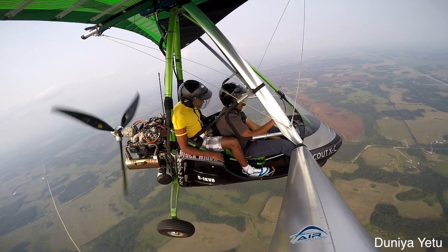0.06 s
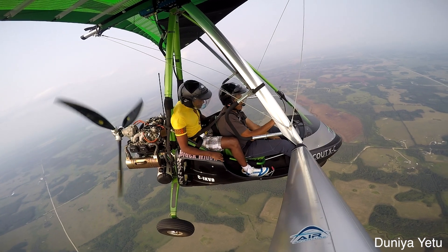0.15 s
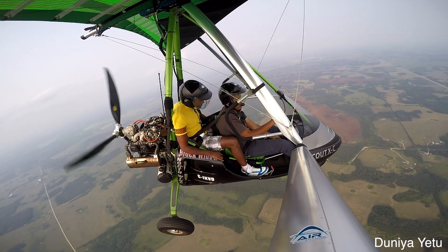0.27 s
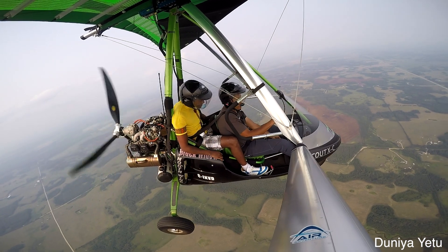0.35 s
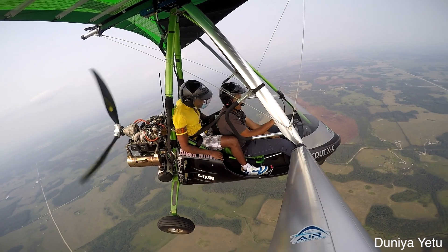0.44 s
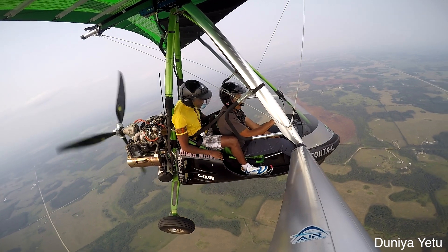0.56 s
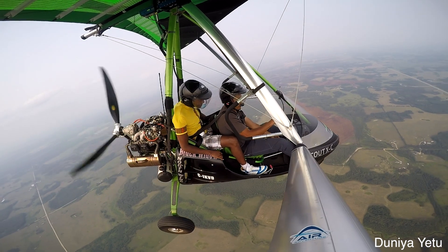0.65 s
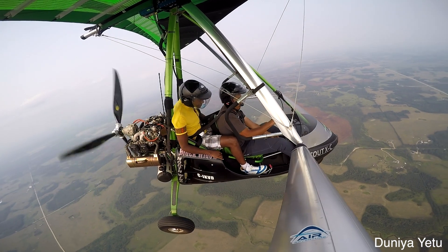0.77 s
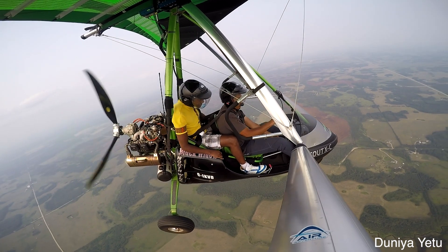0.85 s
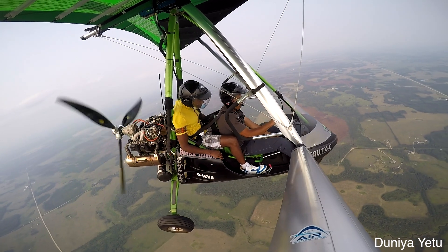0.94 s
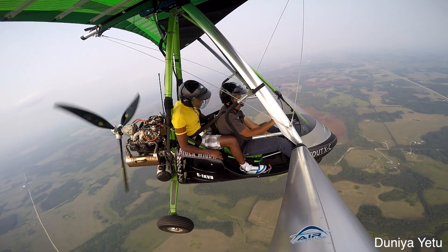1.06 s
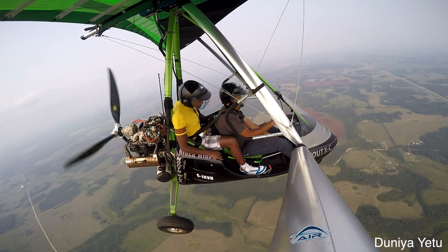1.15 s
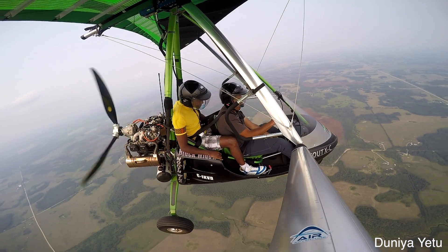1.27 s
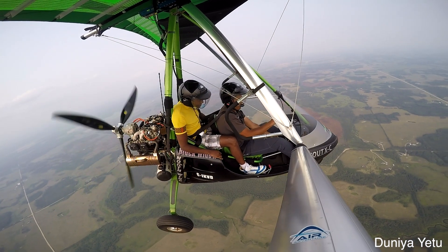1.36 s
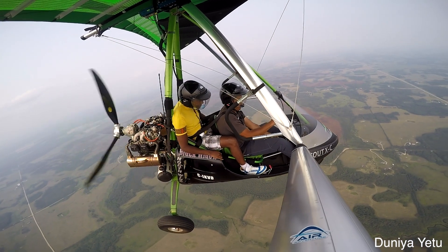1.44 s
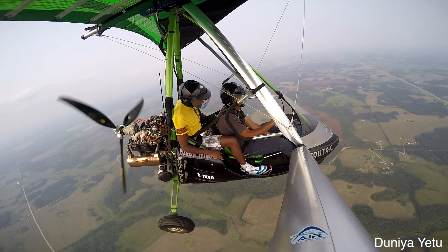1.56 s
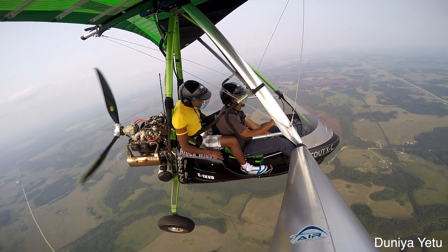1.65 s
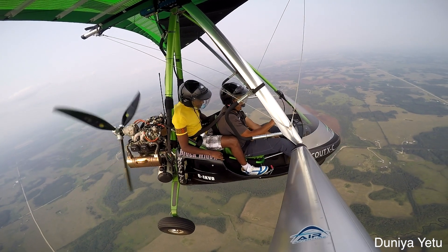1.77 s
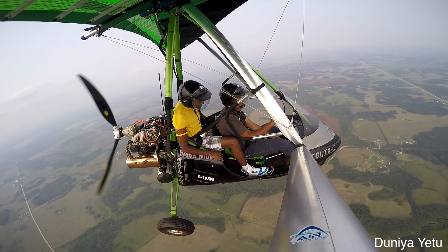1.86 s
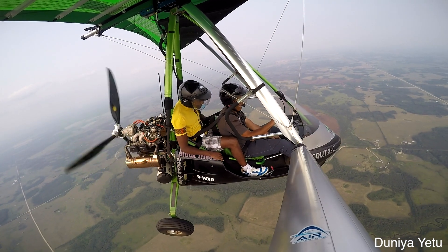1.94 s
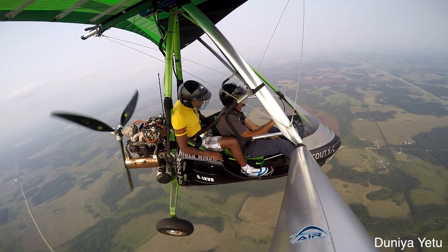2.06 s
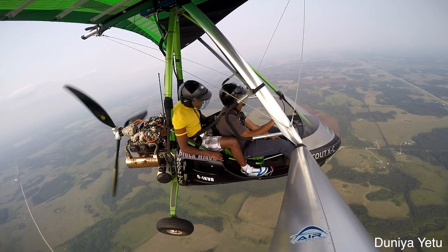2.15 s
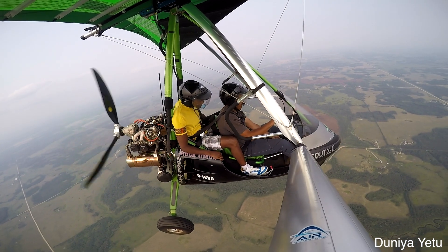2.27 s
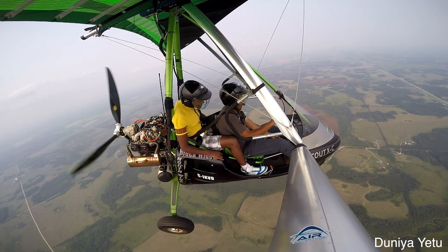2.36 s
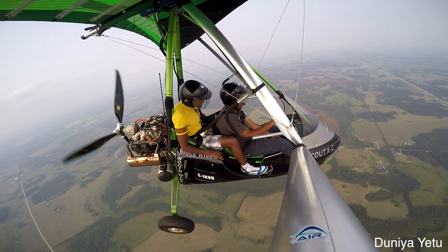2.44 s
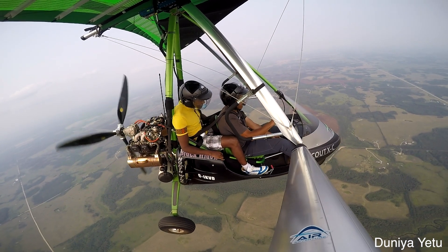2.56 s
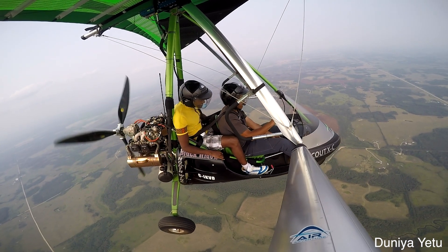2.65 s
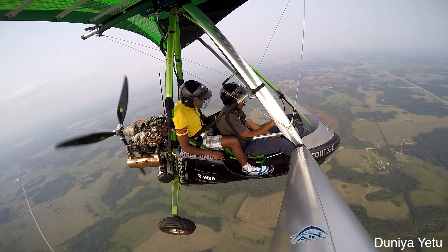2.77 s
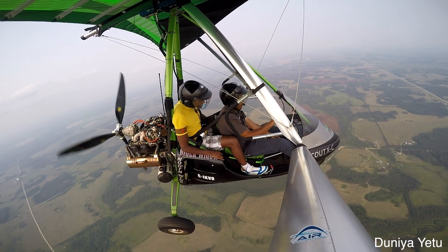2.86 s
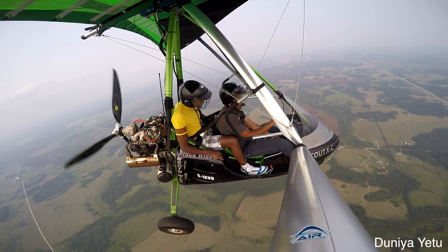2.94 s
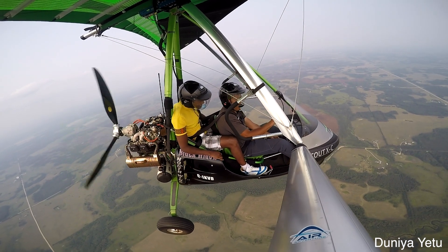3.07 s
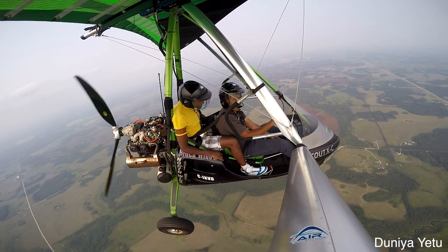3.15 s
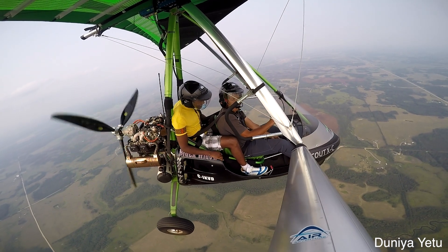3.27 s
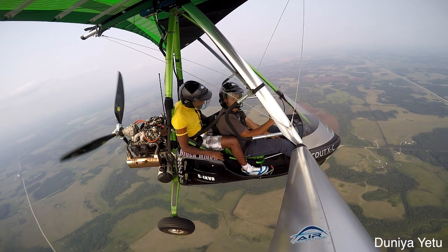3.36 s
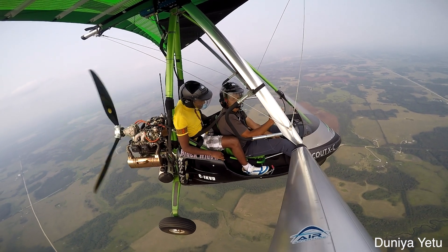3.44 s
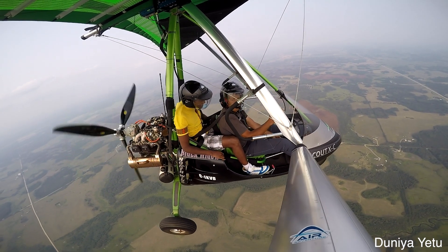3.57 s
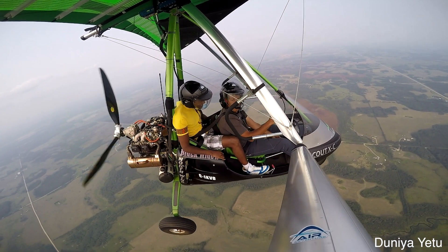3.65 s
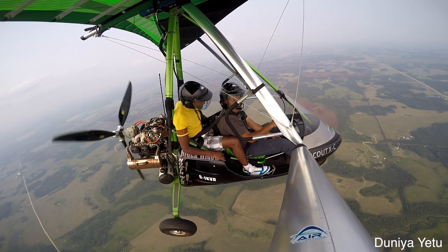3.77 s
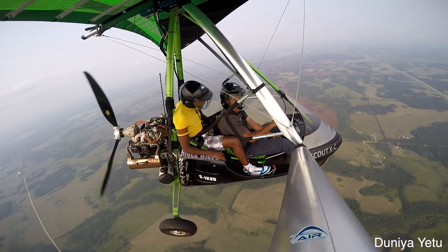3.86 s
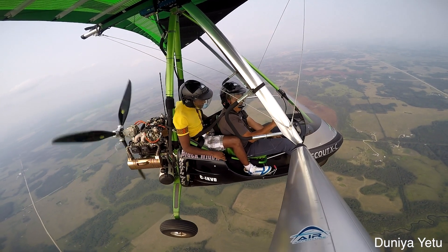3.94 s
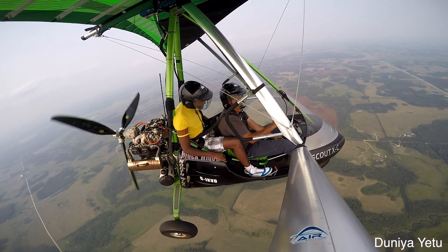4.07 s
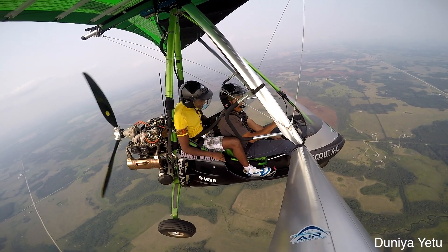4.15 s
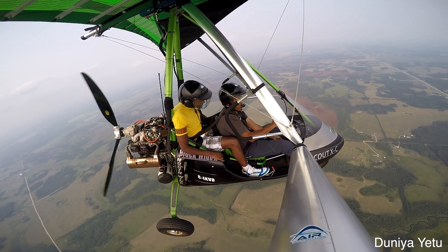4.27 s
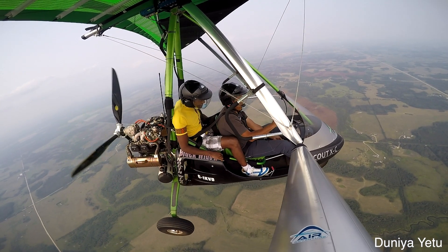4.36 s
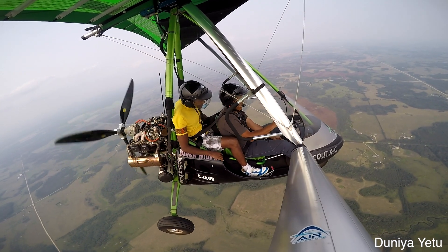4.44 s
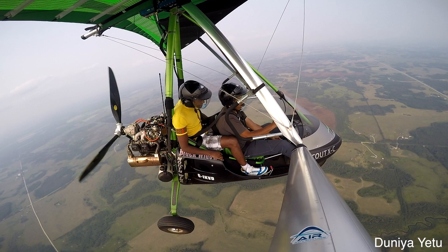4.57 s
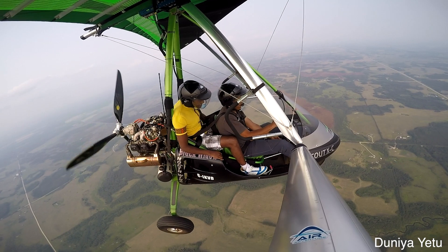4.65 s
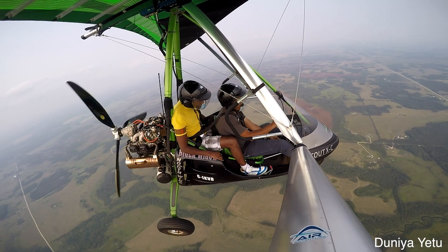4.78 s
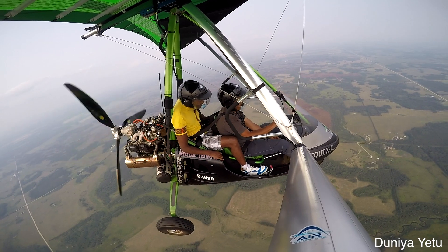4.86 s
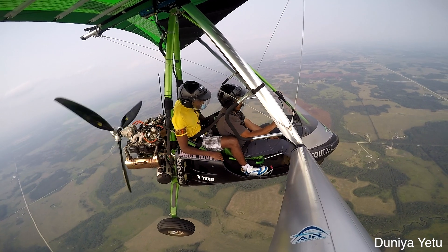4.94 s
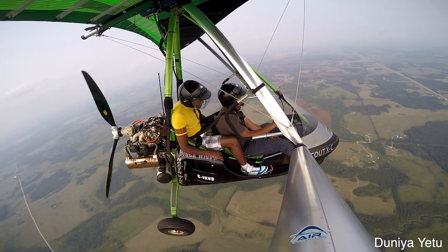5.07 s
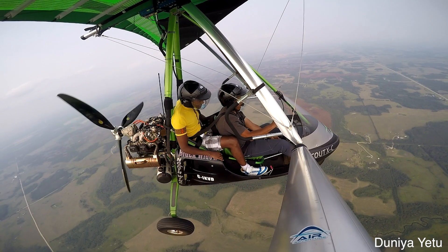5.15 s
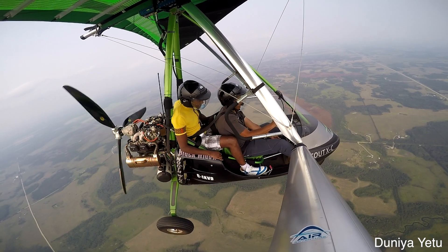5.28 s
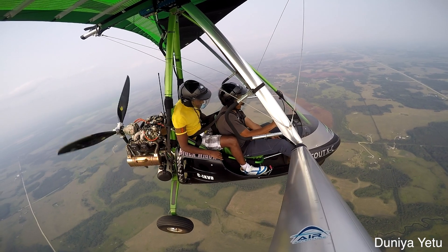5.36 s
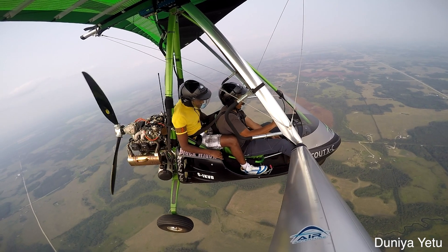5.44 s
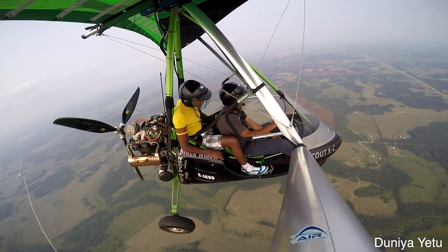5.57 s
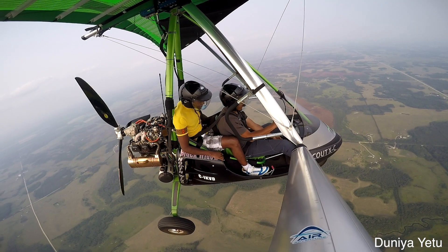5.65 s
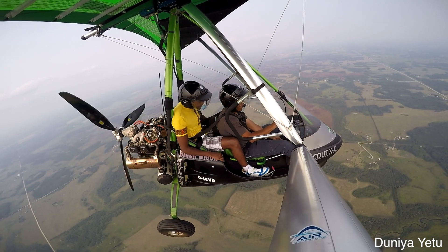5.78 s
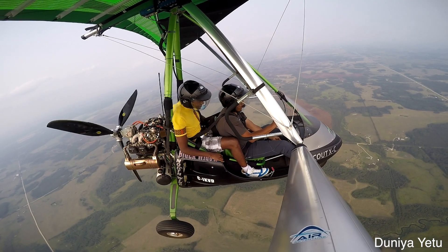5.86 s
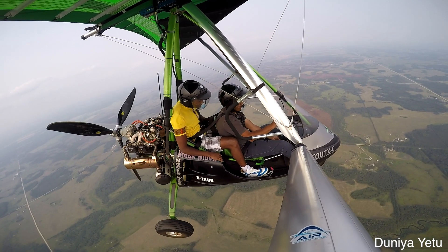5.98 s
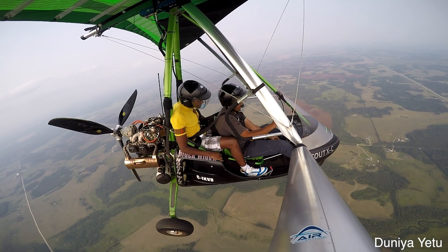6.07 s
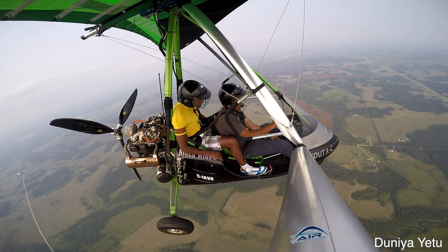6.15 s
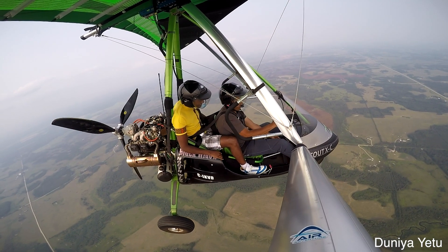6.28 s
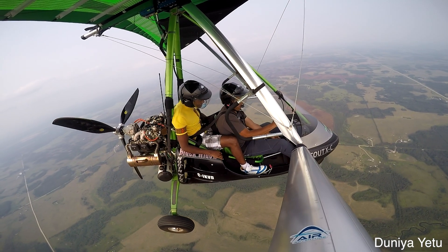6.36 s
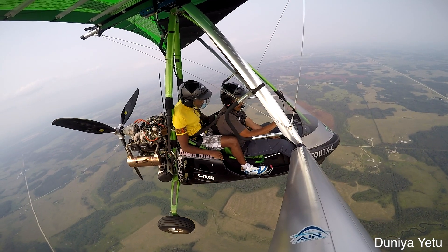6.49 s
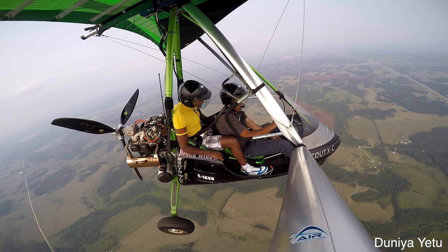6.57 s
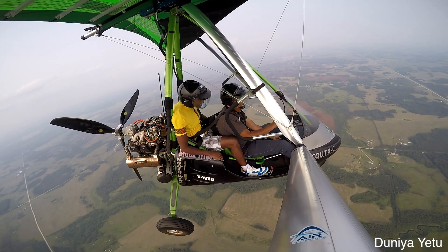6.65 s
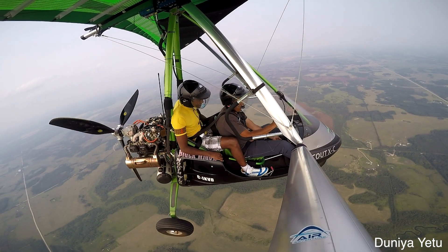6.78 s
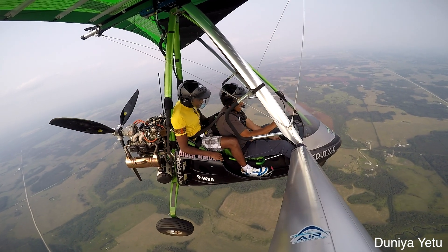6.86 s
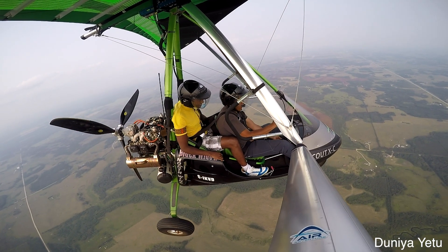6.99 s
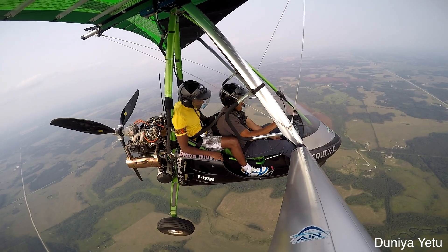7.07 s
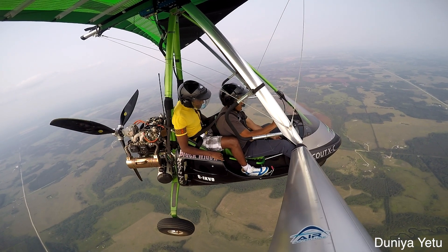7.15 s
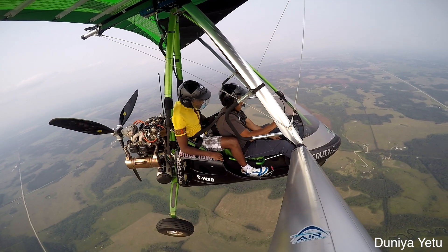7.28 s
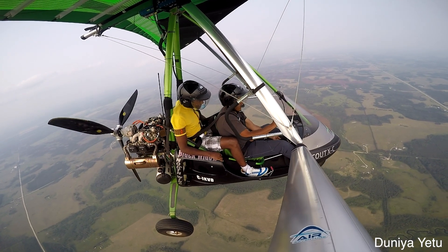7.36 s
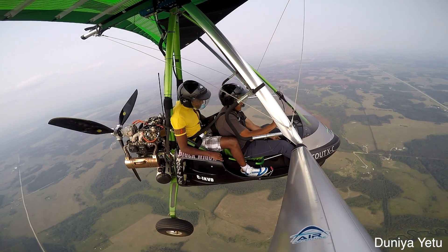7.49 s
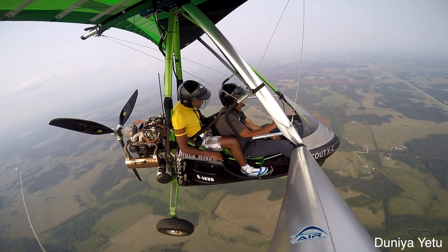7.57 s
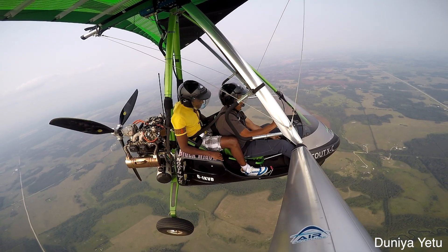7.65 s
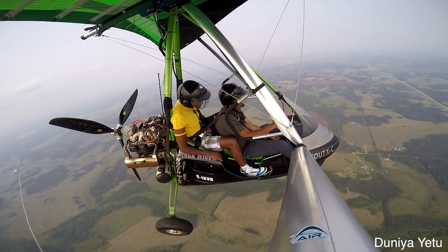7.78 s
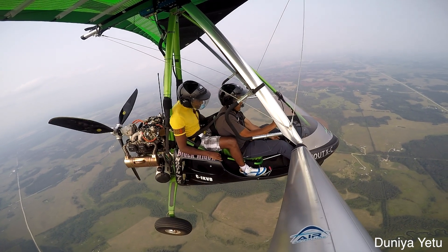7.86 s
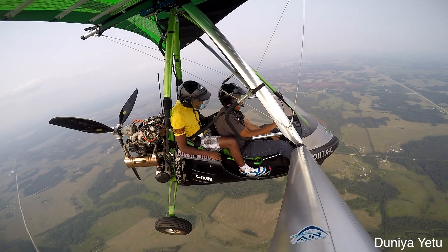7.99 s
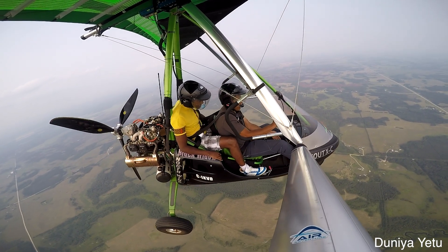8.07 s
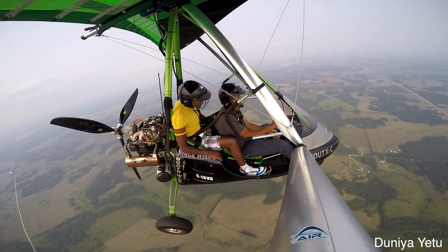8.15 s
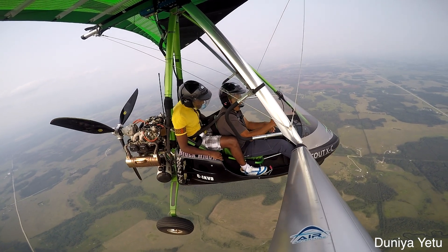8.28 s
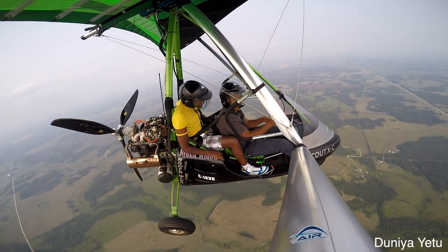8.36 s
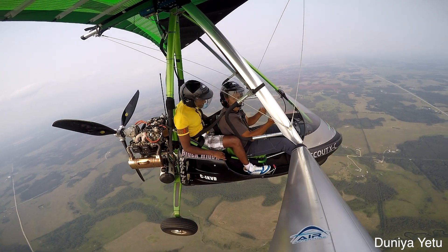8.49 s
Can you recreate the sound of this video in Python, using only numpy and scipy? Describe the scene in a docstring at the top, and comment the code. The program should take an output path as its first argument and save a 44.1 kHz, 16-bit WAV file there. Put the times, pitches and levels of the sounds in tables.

```python
"""Microlight glide with the propeller running down

A microlight trike glides, heard from a microphone in a housing on a pole fixed to the wing.
The three-blade propeller slows to a stop: sines at multiples of its speed sweep through the pole's resonance.
The loose mount knocks at listed times: bursts of chattering noise ring its modes, some with rebounds.
Wind is shaped noise: it hums on the tubes, whistles on the wires, rushes over the housing and buffets the pole."""
import sys
import numpy as np
from scipy import signal
from scipy.fft import rfft, irfft
from scipy.io import wavfile
from scipy.ndimage import uniform_filter1d, minimum_filter1d, map_coordinates

SR = 44100
rng = np.random.default_rng(int(sys.argv[2]) if len(sys.argv) > 2 else 0)


def inscribe(sig):
    """Save sig as 16-bit PCM at rate SR to the path in sys.argv[1].

    A 1-D sig is mono; a 2-D sig holds one channel per row.
    Samples are clipped to [-1, 1] before scaling.
    """
    pcm = np.round(np.clip(np.atleast_2d(sig).T, -1, 1) * 32767)
    wavfile.write(sys.argv[1], SR, pcm.astype(np.int16))


N = 375732  # length in samples


def propeller(start_turns_per_s=18.4, stop_s=6.2, run_down_power=0.69, pole_hz=29.9, pole_q=3.9, unsteady_db=1.5):
    """The falling orders of the shaft swell as each sweeps through the pole's bending resonance."""
    # shakes per turn of the shaft (three is the blade pass)
    shaft_orders = (2, 3, 4, 6)
    # strength of each order at the pole's resonance: level_db
    order_db = [-13.5, -14.5, -27, -15.5]
    # a power under 1 means that friction brakes the propeller hardest at the end
    time_left = np.maximum(1 - np.arange(N) / SR / stop_s, 1e-6)
    turns_per_s = start_turns_per_s * time_left ** run_down_power
    shaft_angle = 2 * np.pi * np.cumsum(turns_per_s) / SR
    shaking = np.zeros(N)
    for order, db in zip(shaft_orders, order_db):
        ratio = order * turns_per_s / pole_hz
        # complex response: both the swell and the phase shift of the resonance
        response = 1 / (1 + 1j * pole_q * (ratio - 1 / ratio))
        strength = np.sqrt(2) * from_db(db + unsteady_db * drift(3.7))
        shaking += strength * np.imag(response * np.exp(1j * order * shaft_angle))
    return shaking


def mount_knocks(level_db=1.0, chatter_s=0.0029, crack_db=8.5, edge_db=-9.0, edge_s=0.003, ping_hz=4200):
    """Each knock is a few milliseconds of chattering contact: a crack, then the ring of the mount's modes."""
    # what the mount and housing ring with: mode_hz [Hz], level_db [dB], t60_s [s]
    mount_modes = [(761, -9.5, 0.027), (1045, -10.5, 0.024), (1360, -14.5, 0.034), (1724, -17.5, 0.022),
                   (2170, -11, 0.021), (2570, -11.5, 0.019), (3150, -14, 0.015), (3660, -14, .014),
                   (3950, -21, .014), (4486, -8, 0.013), (5080, -10.5, 0.0088), (5610, -12.5, 0.0094),
                   (5920, -22, 0.0075)]
    times_s, strength_db, ping_db = np.transpose(contacts())
    t = np.arange(2200) / SR
    chatter = rng.standard_normal((len(times_s), len(t)))
    contact = unit_energy(chatter * np.exp(-(t / chatter_s) ** 2))
    knocks = from_db(crack_db) * contact
    for hz, db, t60 in mount_modes:
        # a mode weighs as much as its ring from a single click
        size = np.linalg.norm(ring(t == 0, hz, t60))
        # a harder contact favours the high, pinging modes; each knock also differs by chance
        colour_db = ping_db * (hz > ping_hz) + rng.normal(0, 1, len(times_s))
        mode_gain = size * from_db(db + colour_db)[:, None]
        knocks += mode_gain * unit_energy(ring(contact, hz, t60))
    # the small stiff housing passes no bass and little top
    housing = signal.butter(6, [600, 6400], "band", fs=SR, output="sos")
    knocks = signal.sosfilt(housing, knocks)
    # a brief bright edge, stronger for a harder contact
    bright = signal.butter(2, [5500, 11000], "band", fs=SR, output="sos")
    edge = signal.sosfilt(bright, unit_energy(contact * np.exp(-t / edge_s)))
    knocks += from_db(edge_db + ping_db)[:, None] * edge
    out = np.zeros(N)
    for s, db, knock in zip(times_s, strength_db, knocks):
        start = int(s * SR)
        out[start:start + len(t)] += from_db(level_db + db) * knock
    return out


def contacts(rebound_s=0.0475, rebound_loss_db=6):
    """The loose mount rebounds at a steady pace, weaker each time; rows of (s, strength dB, ping dB)."""
    # knocks of the mount: start_s [s], strength_db [dB], ping_emphasis_db [dB], rebounds [count]
    knock_list = [(0.9427, -9, -2, 0), (.9853, -10.5, 3, 1), (1.4942, -5, -4, 0), (1.5515, -11.5, 4, 0),
                  (2.903, -7, -10, 0), (3.2552, -5.5, -3.5, 0), (3.7858, -4.5, -8, 1), (4.039, -4.5, -6, 1),
                  (4.6302, -9, -3, 0), (4.7437, -6, -6, 0), (4.7960, 0.5, 2.5, 1), (4.899, 3.5, 0, 0),
                  (4.9486, -1, 0, 3), (5.1439, -11, 3.5, 0), (5.3015, -1, 0.5, 0), (5.5197, -5.5, -4, 0),
                  (5.641, 1.5, 3, 0), (7.1595, -5.5, -6, 0), (7.895, -9.5, 5, 0)]
    rows = []
    for s, db, ping_db, rebounds in knock_list:
        for k in range(1 + rebounds):
            rows.append((s + k * rebound_s, db - k * rebound_loss_db, ping_db))
    return rows


def tube_hum(hum_db, steadiness=0.31, wander=0.0222):
    """Vortex shedding is a half-steady tone on each tube; all pitches wander together."""
    # vortices shed by tubes and struts: pitch_hz [Hz], width_hz [Hz], level_db [dB per Hz]
    tube_tones = [(137.8, 17.3, -33.5), (170, 17, -39), (189.4, 15.3, -43.5), (230.1, 14.6, -39),
                  (260, 26, -49.5), (287.3, 15.3, -50)]
    hum = np.zeros(N)
    for tone in tube_tones:
        shed = noise(humps([tone]))
        # dividing by part of the tone's own swell evens out its loudness
        power = uniform_filter1d(shed ** 2, size=600)
        swell = np.sqrt(np.maximum(power, 1e-12)) / shed.std()
        hum += shed / swell ** steadiness
    # reading at an uneven pace bends the pitch
    clock = np.arange(N) + np.cumsum(wander * drift(3.037))
    hum = map_coordinates(hum, [clock], order=1, mode="reflect")
    return from_db(hum_db - hum_db.mean()) * hum


def wind(rush_db, flutter_db=0.71, whistle_flutter_db=-0.6):
    """Turbulent rush and narrow whistles rise and flutter together; the whistles also waver on their own."""
    # turbulence over the housing, at mean airstream: frequency_hz [Hz], level_db [dB per Hz]
    rush_curve = [(200, -60), (350, -62.5), (520, -65.5), (660, -62.5), (1100, -60.5), (2000, -60),
                  (3700, -59.5), (4250, -68), (6000, -74.5), (8300, -80.5), (9700, -84), (11800, -84.5),
                  (12600, -88), (15200, -95)]
    # wires and housing gaps, at mean airstream: pitch_hz [Hz], width_hz [Hz], level_db [dB per Hz]
    whistle_tones = [(714, 170, -58.5), (869, 31, -52), (1261, 59, -56.5), (1600, 355, -60),
                     (2520, 322, -53.5), (2920, 200, -55.5), (3170, 350, -62), (3870, 173, -57.5),
                     (4676, 390, -67.5), (5520, 190, -69.5), (6624, 820, -67), (10570, 710, -85)]
    gust_db = rush_db - rush_db.mean() + flutter_db * drift(58)
    rush = noise(slope(rush_curve))
    whistles = from_db(whistle_flutter_db * drift(13)) * noise(humps(whistle_tones))
    return from_db(gust_db) * (rush + whistles)


def buffeting(rush_db, gust_share=0.15):
    """Large eddies rock the pole and thump on the microphone: low noise that follows the gusts a little."""
    # buffeting below the rush, at mean airstream: frequency_hz [Hz], level_db [dB per Hz]
    buffet_curve = [(8, -72), (17, -50), (23, -29.5), (28, -27.5), (35, -38.5), (44, -42.5), (55, -48),
                    (78, -50.5), (105, -55.5), (260, -54.5), (335, -68.5), (700, -102)]
    gust_db = gust_share * (rush_db - rush_db.mean())
    return from_db(gust_db) * noise(slope(buffet_curve))


def ring(clicks, hz, t60):
    """A unit click sets a sine ringing that starts at height 1 and falls 60 dB in t60 seconds."""
    r = from_db(-60 / (t60 * SR))  # decay per sample
    w = 2 * np.pi * hz / SR  # radians per sample
    return signal.lfilter([0, np.sin(w)], [1, -2 * r * np.cos(w), r * r], clicks + 1e-18)


def unit_energy(x):
    """Each row scaled to energy 1."""
    return x / np.sqrt(np.sum(x ** 2, axis=-1, keepdims=True) + 1e-20)


def noise(gain):
    """Noise with the given amplitude density per Hz."""
    return irfft(rfft(rng.standard_normal(N)) * gain * np.sqrt(SR / 2), N)


def drift(rate_hz):
    """Slow chance with spread 1, fading out above the given rate."""
    slow = noise(1 / (1 + (bin_hz() / rate_hz) ** 2))
    return slow / slow.std()


def slope(points):
    """Gain along a spectrum, joined on a log-frequency axis."""
    hz, db = np.transpose(points)
    return from_db(np.interp(np.log(bin_hz()), np.log(hz), db))


def humps(resonances):
    """Gain of steep-sided resonances, summed in power."""
    power = 0
    for hz, width, db in resonances:
        offset = (bin_hz() - hz) / (width / np.sqrt(2))
        power = power + (from_db(db) / (1 + offset ** 2)) ** 2
    return np.sqrt(power)


def bin_hz():
    """Frequencies of the spectrum bins, kept above zero for the logarithm."""
    return np.maximum(np.arange(N // 2 + 1) * SR / N, 1e-3)


def in_time(rows):
    """Each column of a curve at every sample."""
    s, *columns = np.transpose(rows)
    return [np.interp(np.arange(N) / SR, s, c) for c in columns]


def from_db(db):
    """Decibels to an amplitude factor."""
    return 10 ** (np.asarray(db) / 20)


def scene(hum_follows=1.26):
    """All sources at one microphone; one airstream drives rush, whistles, hum and buffeting."""
    # rush of air over the housing, used as its rise and fall about the mean: time_s [s], level_db [dB]
    airstream = [(0.0, -21.5), (0.66, -21.5), (1.26, -25.5), (1.68, -25.5), (2.44, -22), (3.89, -23.5),
                 (4.08, -25.5), (5.79, -25), (6.74, -20), (8.52, -19.5)]
    rush_db, = in_time(airstream)
    hum_db = hum_follows * rush_db  # dB of hum per dB of airstream
    machine = propeller() + mount_knocks()
    air = tube_hum(hum_db) + wind(rush_db) + buffeting(rush_db)
    return (machine + air)[None]


def record(dry, ceiling=1.1, cutoff_hz=15050):
    """The microphone drops the deepest shake, a fast limiter holds the peaks and the top is cut."""
    low_cut = signal.butter(4, 17, "high", fs=SR, output="sos")
    x = signal.sosfilt(low_cut, dry)
    limiter_gain = ceiling / np.maximum(np.abs(x), ceiling)
    # hold the lowest gain around each peak, then smooth it (41 samples are about 1 ms)
    x = x * uniform_filter1d(minimum_filter1d(limiter_gain, size=41), size=41)
    # rounded clipping near full scale
    x = x / (1 + np.abs(x / 0.98) ** 10) ** (1 / 10)
    top_cut = signal.ellip(10, 0.1, 80, cutoff_hz, fs=SR, output="sos")
    return signal.sosfilt(top_cut, x)


dry = scene()
out = record(dry)
inscribe(out)
```